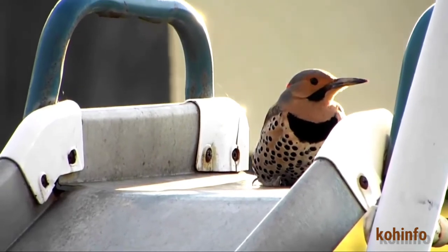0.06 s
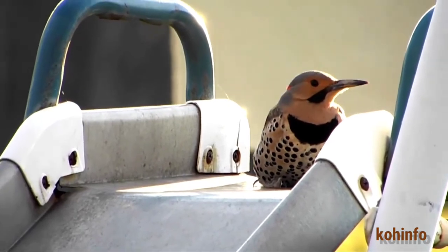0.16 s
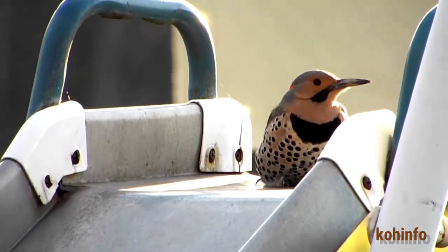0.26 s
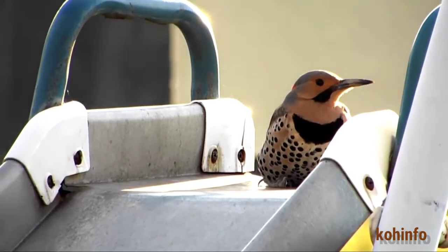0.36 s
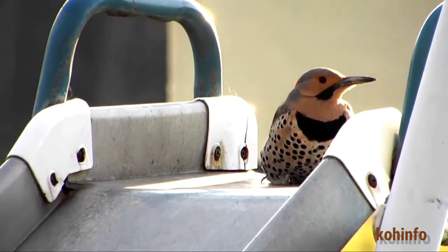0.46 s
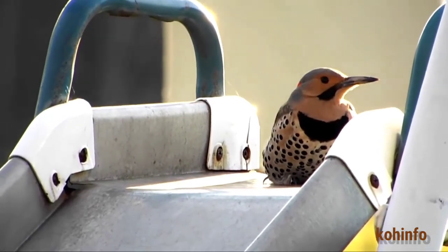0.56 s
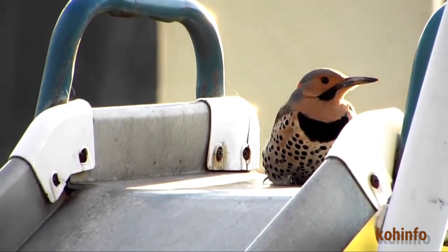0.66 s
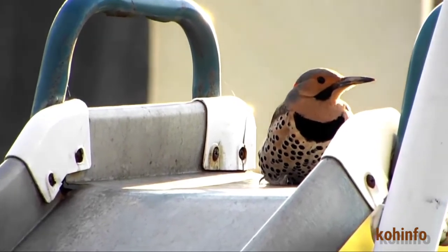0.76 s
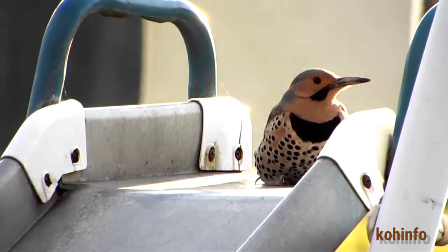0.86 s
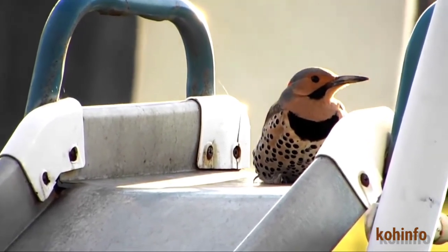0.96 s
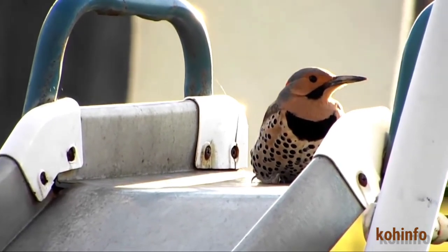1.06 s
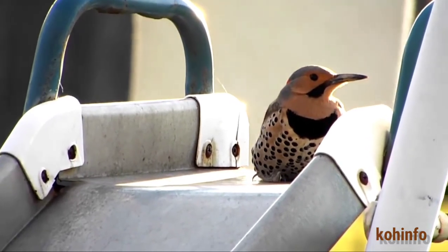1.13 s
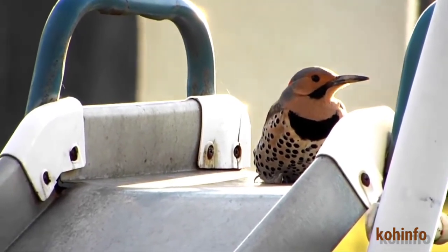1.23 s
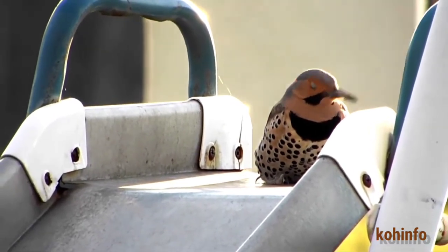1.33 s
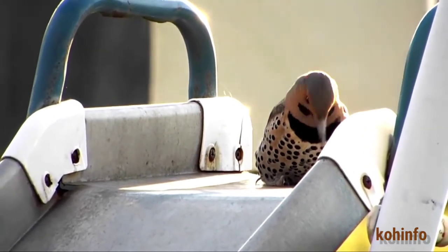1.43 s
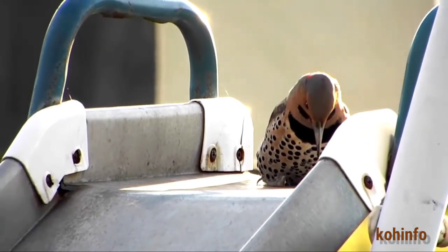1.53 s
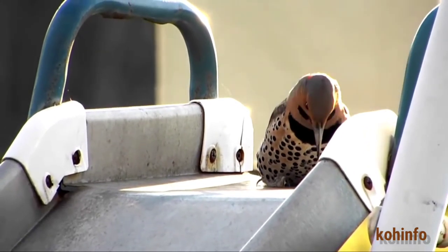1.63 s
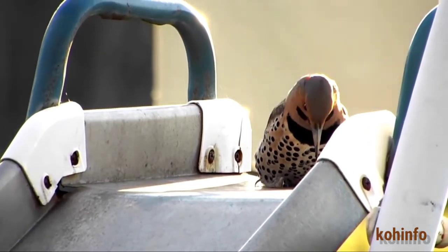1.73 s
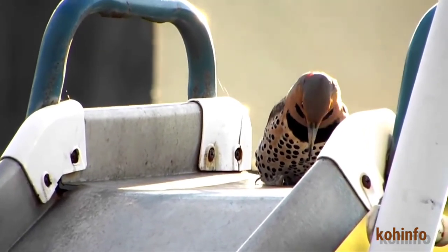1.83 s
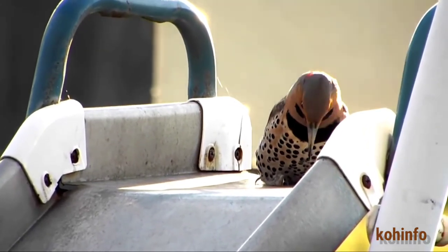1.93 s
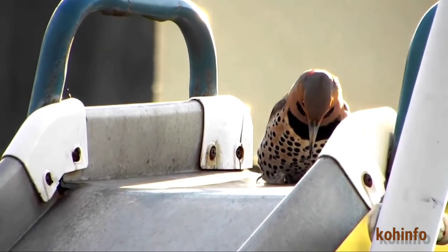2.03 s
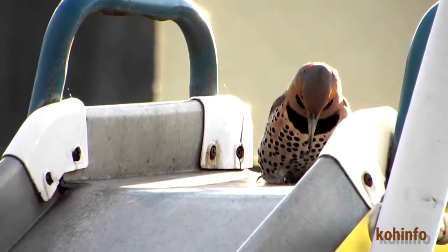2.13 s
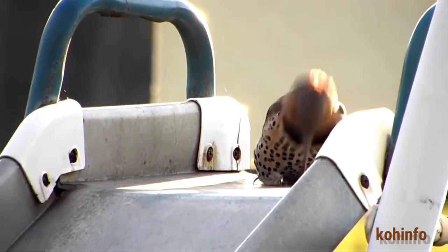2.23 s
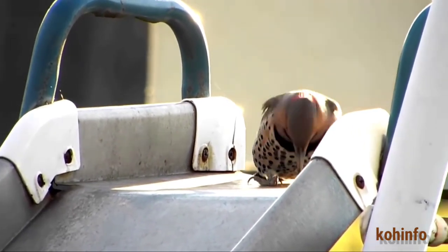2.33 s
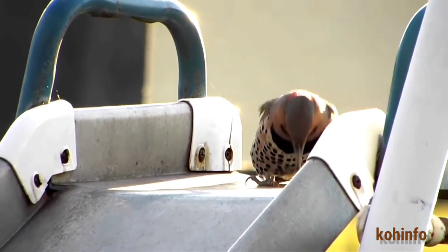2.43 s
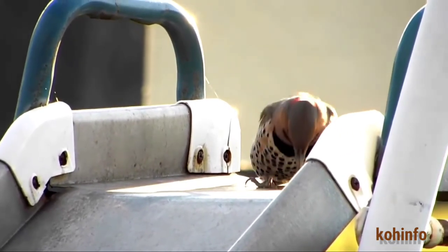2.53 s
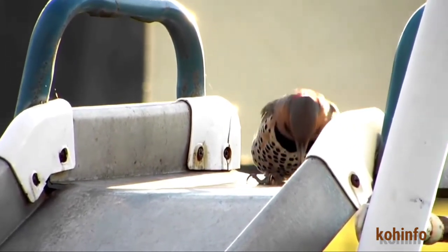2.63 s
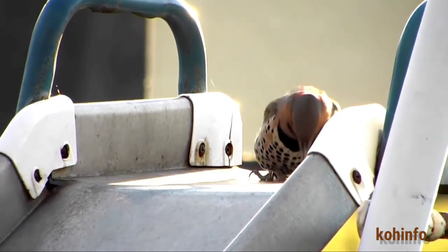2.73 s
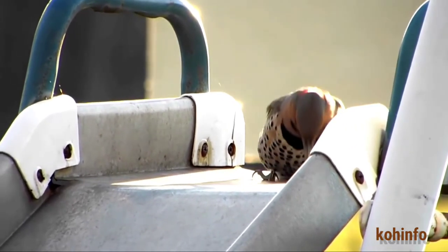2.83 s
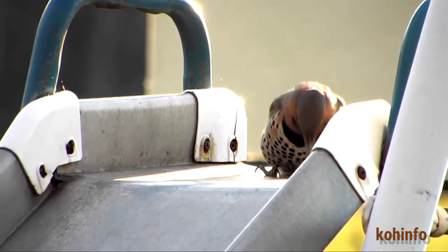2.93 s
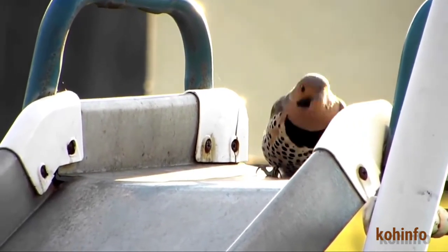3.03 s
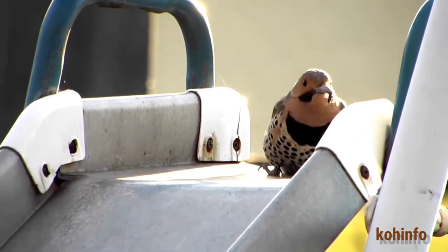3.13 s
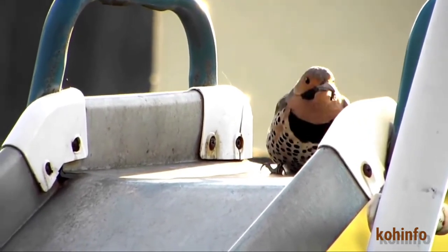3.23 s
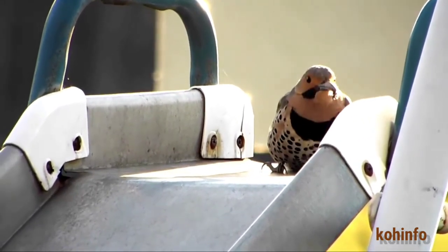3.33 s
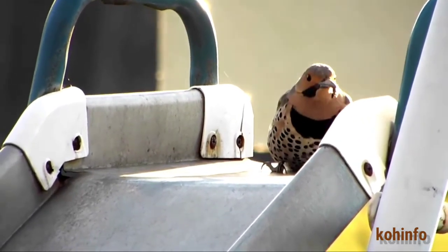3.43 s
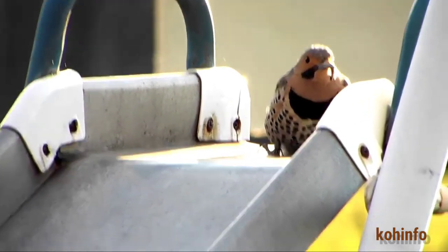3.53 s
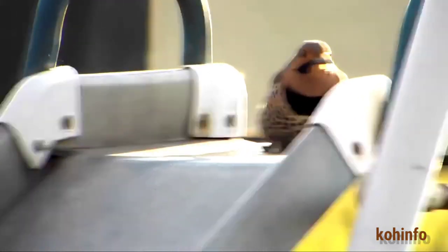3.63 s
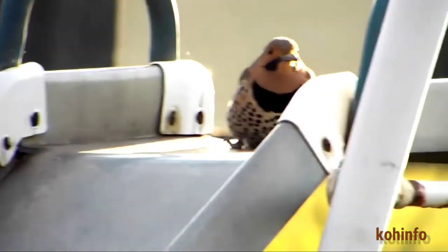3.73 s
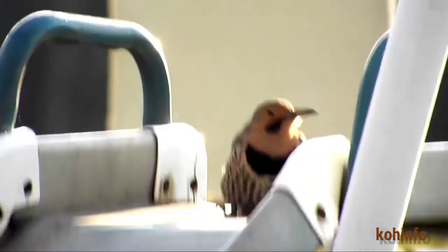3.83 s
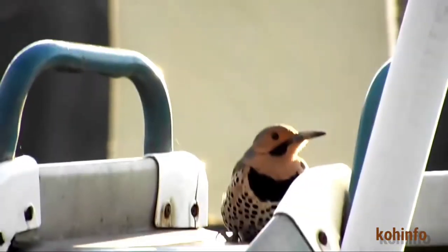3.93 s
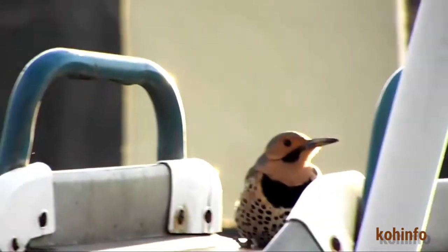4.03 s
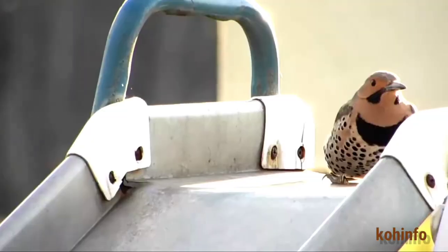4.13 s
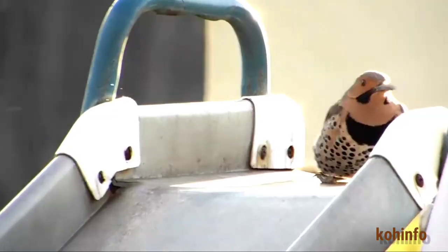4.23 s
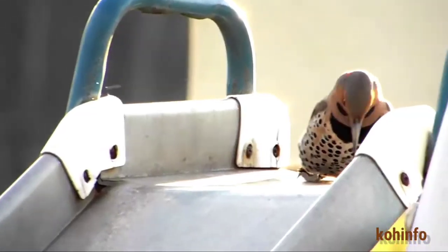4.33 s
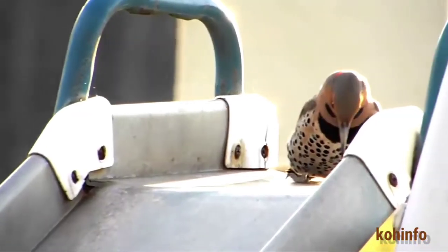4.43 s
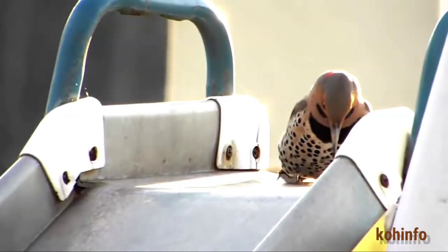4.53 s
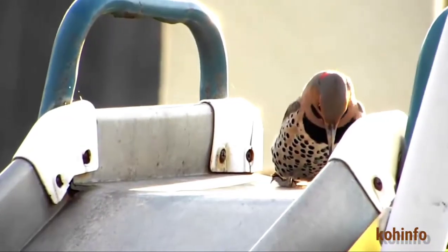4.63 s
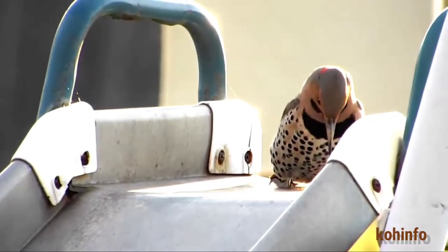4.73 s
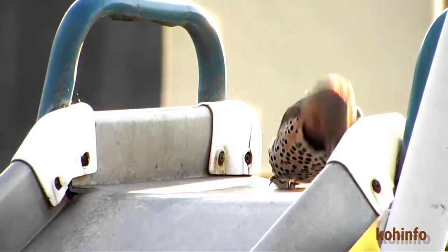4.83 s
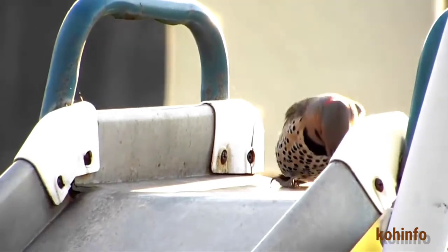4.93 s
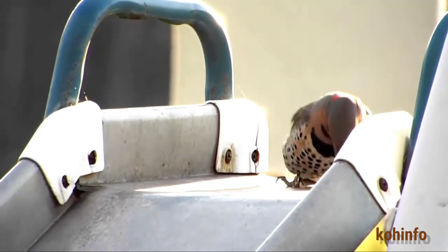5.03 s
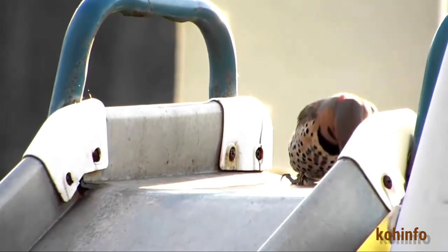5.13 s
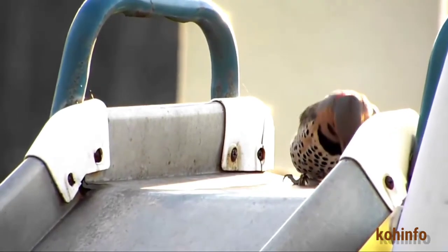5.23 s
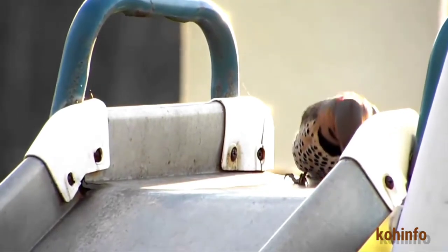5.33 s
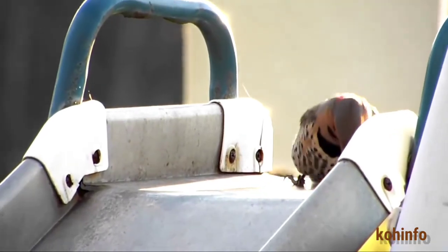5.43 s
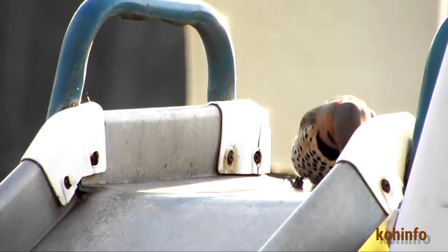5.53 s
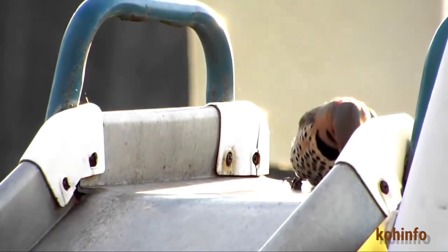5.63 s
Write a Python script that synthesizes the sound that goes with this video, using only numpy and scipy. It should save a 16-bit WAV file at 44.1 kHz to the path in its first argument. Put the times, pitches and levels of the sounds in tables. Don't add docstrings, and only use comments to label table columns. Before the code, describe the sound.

Outdoors, a distant bird trills quickly over murmuring traffic as a car draws away. Thin whistles and buzzes answer. Close by, a woodpecker drums a rapid, loud, clanging roll on hollow sheet metal, with wind thumping the microphone. Sharp claw snaps follow. The scene cuts to a quieter moment that fades in, birds continue, and a second metallic roll rings out.

```python
import sys
import numpy as np
from scipy import signal
from scipy.io import wavfile
from scipy.ndimage import uniform_filter1d

SR = 44100
rng = np.random.default_rng(int(sys.argv[2]) if len(sys.argv) > 2 else 0)


def ratio_of_db(decibels):
    return 10 ** (np.asarray(decibels, float) / 20)


def materialize(psi):
    bounded = np.clip(np.atleast_2d(psi).T, -1, 1)
    quanta = np.round(bounded * 32767).astype(np.int16)
    wavfile.write(sys.argv[1], SR, quanta)


N = 250033
CUT_S = 4.177


def evened(x):
    return x / np.sqrt(np.mean(x ** 2) + 1e-20)


def read(points, hz):
    f, value = np.transpose(points)
    return np.interp(np.log(hz + 1), np.log(f + 1), value)


def follow(curve):
    return np.interp(np.arange(N) / SR, *np.transpose(curve))


def add(mix, s, sound):
    part = mix[..., round(s * SR):][..., :sound.shape[-1]]
    part += sound[..., :part.shape[-1]]


def pan(db):
    return ratio_of_db(np.array([[db / 2], [-db / 2]]))


def noise(colour, size, same, patchy_db, length=N, t60=None):
    frames, hz = length * 4 // size + 5, np.fft.rfftfreq(size, 1 / SR)
    a, b, c, d, patches = rng.standard_normal((frames, len(hz), 5)).T
    patches = uniform_filter1d(patches, size // 64, 0)
    patches = evened(uniform_filter1d(patches, 8192 // size, 1))
    db = read(colour, hz)[:, None] + patchy_db * patches
    if t60:
        frame_s = np.arange(frames) * size / 4 / SR
        db = db - 60 * frame_s / read(t60, hz)[:, None]
    same = np.clip(read(same, hz), 0, 1)[:, None]
    left = a + 1j * b
    right = same * left + np.sqrt(1 - same ** 2) * (c + 1j * d)
    z = np.array([left, right]) * ratio_of_db(db)
    return evened(signal.istft(z, nperseg=size, noverlap=size * 3 // 4)[1][:, :length])


def tone(hz):
    return np.sin(2 * np.pi * np.cumsum(hz) / SR)


# mode_hz, level_db
FRAME_MODES = [
    [(344.5, -20.5), (748.3, -27), (893.6, -23), (1104, -18), (1297, -24), (1712, -29), (1809, -18),
     (1933, -37), (2369, -33), (2638, -29.5), (2972, -25), (3095, -37), (3246, -43), (3386, -29),
     (3709, -43), (3768, -46), (4091, -37), (4301, -48)],
    [(344.5, -22.5), (463.0, -40), (904.4, -21), (1093, -17), (1222, -51), (1297, -21.5), (1690, -44),
     (1803, -19), (1916, -28), (2035, -27), (2175, -45), (2466, -29.5), (3036, -27), (3779, -62),
     (3919, -59), (4113, -58), (4210, -59), (4382, -61)],
]
# mode_hz, t60_s
FRAME_DECAY = [(300, .36), (1000, .17), (2000, .28), (6000, .22)]
# band_hz, density_db (per Hz)
PANEL_COLOUR = [(240, -7), (400, 4), (653, -10.5), (874, 1), (973, -4), (1320, 6.5), (1590, -7), (1820, 5),
                (2190, -8), (5760, -7.5), (7710, -22), (12800, -22.5), (15600, -34)]
# band_hz, t60_s
PANEL_DECAY = [(300, .42), (1000, .4), (2000, .38), (6000, .45), (12000, .24)]


def drumming():
    out, t = np.zeros((2, N)), np.arange(SR // 3) / SR
    panels = dict(size=256, same=[(500, 1.0), (3000, 0.99), (7000, 0.82), (12000, 0.37)],
                  patchy_db=0.0, length=len(t), t60=PANEL_DECAY)
    usual = noise(PANEL_COLOUR, **panels)
    for s, db in blows():
        hz, mode_db = np.transpose(FRAME_MODES[int(s > CUT_S)])[:, :, None]
        spot_db = 2.2 * rng.standard_normal(hz.shape)
        turn = hz * s + np.clip(hz / 4000, .14, .3) * rng.standard_normal(hz.shape)
        decay_db = 60 * t / read(FRAME_DECAY, hz)
        modes = ratio_of_db(mode_db + spot_db - decay_db) * np.sin(2 * np.pi * (hz * t + turn))
        modes = modes * np.minimum(hz * t / 4, 1)
        clatter = .4 * usual + .9 * noise(PANEL_COLOUR, **panels)
        blow = ratio_of_db(8.0) * modes.sum(0) + ratio_of_db(-18.0) * clatter
        add(out, s, ratio_of_db(db) * blow * np.minimum(t / 0.0002, 1))
    return out


BEAT_S, UNEVEN_S = .04045, .0012
OPENING_DB, OPENING_S = 2, 0.038
SWAY_DB = 0.73
TIRE_DB, TIRE_S, TIRE_AT_S = -7.5, 0.058, 3.106
# first_blow_s, second_blow_s, blow_count, strength_db
DRUM_ROLLS = [
    (2.331, 2.379, 20, -8),
    (4.933, 4.974, 18, -8),
]


def blows():
    for first, second, count, db in DRUM_ROLLS:
        chance = rng.standard_normal((count, 2))
        later = second + BEAT_S * np.arange(count - 1) + UNEVEN_S * chance[1:, 0]
        s = np.r_[first, later]
        opening = OPENING_DB * np.exp(-((s - first) / OPENING_S) ** 2)
        tired = TIRE_DB * np.exp(-abs(s - TIRE_AT_S) / TIRE_S)
        yield from zip(s, db + opening + SWAY_DB * chance[:, 1] + tired)


# start_s, peak_db, ring_hz, high_ring_db, low_knock_db
CLAW_SNAPS = [
    (.924, -23, 4300, -20, -6),
    (2.244, -25, 5400, -20, -30),
    (3.6675, -11, 6400, -10, -25),
    (3.673, 3, 5670, -2, -22),
    (3.795, -25, 6500, -6, -25),
    (3.809, -2, 5630, -18, -11),
]


def snaps():
    out, t = np.zeros((2, N)), np.arange(1200) / SR
    crack_colour = [(700, -12), (2500, -2), (4500, 1), (9000, -6), (15500, -13)]
    for s, db, hz, high_db, knock_db in CLAW_SNAPS:
        crack = noise(crack_colour, size=256, same=[(1000, .3)], patchy_db=0, length=len(t))
        ring = np.sin(2 * np.pi * hz * t)
        ring = ring + 0.98 * np.sin(2 * np.pi * 1.11 * hz * t) + 0.26 * np.sin(2 * np.pi * .85 * hz * t)
        high = ratio_of_db(high_db) * np.sin(2 * np.pi * 7900 * t) * np.exp(-t / 0.0023)
        knock = np.sin(2 * np.pi * 900 * t) * np.exp(-t / 0.0048)
        bright = ring * np.exp(-t / .0028) + high + ratio_of_db(-6) * crack * np.exp(-t / .0025)
        add(out, s, ratio_of_db(db - 4) * pan(-4.5) * bright + ratio_of_db(db + knock_db) * knock)
    return out


def birds():
    far, near, thin, buzz = trill(), whistles(), seeps(), buzzes()
    direct = far * pan(.3) + near * pan(-2.0) + thin * pan(.3) + buzz * pan(-0.55)
    wet = far * ratio_of_db(.5) + near * ratio_of_db(-8) + thin * ratio_of_db(-7) + buzz * ratio_of_db(-6)
    return direct + garden(wet, far + ratio_of_db(-13) * buzz)


def trill():
    out, u = np.zeros(N), np.linspace(0, 1, 780)
    flick = tone(np.linspace(5200, 8200, 260)) * np.hanning(260)
    for s, db, hz, fall in chips():
        edges = np.minimum(u / 0.12, 1) * np.minimum((1 - u) / 0.096, 1)
        chip = tone(hz * (1.03 - fall * u ** 1.08)) * ratio_of_db(-12 * u) * edges
        add(out, s - .003, ratio_of_db(db - 7.0) * chip)
        add(out, s + 0.014, ratio_of_db(db - 21) * flick)
    return out


CHIP_START_S, CHIP_GAP_S, CHIPS = .3795, .05682, 27
CHIP_HZ, CHIP_HZ_PER_DB, CHIP_FALL, FALL_PER_DB = 5990, 12, .33, .006
# time_s, peak_db
TRILL_EFFORT = [(.38, -20.5), (.55, -17.5), (.72, -21.5), (.89, -14.5), (1.12, -15), (1.28, -9.5),
                (1.52, -12), (1.64, -13), (1.8, -12.5)]


def chips():
    chance = rng.standard_normal((CHIPS, 4))
    s = CHIP_START_S + CHIP_GAP_S * np.arange(CHIPS) + .0015 * chance[:, 0]
    db = np.interp(s, *np.transpose(TRILL_EFFORT)) + 1.6 * chance[:, 1]
    effort = db - db.max()
    hz = CHIP_HZ + CHIP_HZ_PER_DB * effort + 110 * chance[:, 2]
    return zip(s, db, hz, CHIP_FALL + FALL_PER_DB * effort + .04 * chance[:, 3])


# peak_s, rise_s, fall_s, pitch_hz, peak_db
HELD_WHISTLES = [(1.63, 0.0236, 0.083, 4016, -20), (1.918, .012, 0.039, 2780, -28.5),
                 (2.272, .022, 0.13, 6480, -24), (3.617, 0.036, 0.036, 5640, -26),
                 (3.805, 0.048, 0.0063, 5680, -26.5), (3.843, .01, .015, 5738, -38),
                 (3.942, 0.023, 0.015, 5660, -21.5), (4.112, 0.01, 0.048, 5780, -27),
                 (4.23, .06, 0.35, 4160, -42.5), (4.481, 0.019, 0.019, 2754, -21.5),
                 (5.462, 0.039, 0.014, 3880, -20)]
# start_s, length_s, first_hz, last_hz, peak_db
SLIDING_WHISTLES = [
    (1.455, 0.064, 7066, 6070, -19.5),
    (1.495, 0.043, 6290, 6185, -15),
    (1.655, .032, 3950, 3130, -26),
    (2.965, 0.039, 3700, 3840, -24),
    (2.992, .035, 3800, 3130, -23),
    (3.97, .02, 3600, 3230, -37),
]


def whistles():
    slides = slid(SLIDING_WHISTLES, rise=.35, hold=.3, start_db=-10, end_db=-9)
    return song(held(HELD_WHISTLES) + slides, flutter_db=2.2)


# peak_s, rise_s, fall_s, pitch_hz, peak_db
THIN_SEEPS = [
    (1.06, .015, 0.086, 7380, -42),
    (1.395, .01, 0.039, 7300, -40),
    (1.96, .01, 0.055, 7050, -38),
    (2.892, .012, 0.044, 7110, -35),
    (2.97, .03, .055, 7160, -37),
    (3.29, .03, 0.045, 7000, -33.5),
    (4.04, .04, .14, 6840, -46.5),
    (4.24, .04, 0.07, 6500, -41),
]


def seeps():
    return song(held(THIN_SEEPS), flutter_db=2.5)


# start_s, length_s, first_hz, last_hz, peak_db
HIGH_BUZZ = [
    (1.69, 0.176, 5330, 5220, -23),
    (3.375, 0.15, 4850, 4920, -39.5),
    (4.25, 0.131, 5400, 5240, -22),
]
# start_s, length_s, first_hz, last_hz, peak_db
LOW_BUZZ = [
    (1.95, 0.258, 3680, 3520, -26.5),
    (4.522, 0.15, 3595, 3410, -23),
]
# start_s, length_s, first_hz, last_hz, peak_db
ROUGH_CHIRRS = [
    (.915, 0.073, 4350, 4380, -37),
    (.915, 0.08, 4990, 4990, -38),
    (1.245, 0.12, 3750, 3780, -38.5),
    (1.26, 0.097, 5140, 4870, -33),
    (4.425, .035, 5400, 6900, -37.5),
    (5.365, 0.062, 4290, 4110, -23),
    (5.393, 0.034, 4120, 5410, -19.5),
    (5.458, 0.034, 2960, 3010, -21.5),
]


def buzzes():
    highs = slid(HIGH_BUZZ, rise=.15, hold=.5, start_db=-6, end_db=-14)
    lows = slid(LOW_BUZZ, rise=.15, hold=.5, start_db=-6, end_db=-14)
    chirrs = slid(ROUGH_CHIRRS, rise=.3, hold=.45, start_db=-7, end_db=-8)
    high = song(highs, throb_hz=51.5, dip=.09, flutter_db=1.8)
    low = song(lows, throb_hz=56.2, dip=.18, flutter_db=1.5)
    chirr = song(chirrs, throb_hz=140, dip=.16, flutter_db=2.2)
    return ratio_of_db(-3.0) * high + ratio_of_db(-6.0) * low + ratio_of_db(-3) * chirr


def held(rows):
    edge_db, sag = -14, .009
    return [[(s - rise, hz * (1 + sag), db + edge_db), (s, hz, db), (s + fall, hz * (1 - sag), db + edge_db)]
            for s, rise, fall, hz, db in rows]


def slid(rows, rise, hold, start_db, end_db):
    share = np.array([0, rise, min(rise + hold, .99), 1])
    edge_db = np.array([start_db, 0, 0, end_db])
    return [np.c_[s + length * share, first + (last - first) * share, db + edge_db]
            for s, length, first, last, db in rows]


def song(notes, throb_hz=0, dip=0, flutter_db=1.2):
    out = np.zeros(N)
    for rows in notes:
        s, hz, db = np.transpose(rows)
        t = np.arange(s[0], s[-1], 1 / SR)
        cycle = (t - s[0]) * throb_hz % 1
        grain = np.sin(np.pi * cycle) ** 4 * 2.34 if throb_hz else 1
        drift = uniform_filter1d(rng.standard_normal(len(t)), size=200)
        flutter = ratio_of_db(flutter_db * evened(uniform_filter1d(drift, size=200)))
        wobble = np.log(flutter) / np.log(ratio_of_db(flutter_db))
        pitch = np.interp(t, s, hz) * (1 + dip * (.5 - cycle) + .1 * dip * wobble)
        level = ratio_of_db(np.interp(t, s, db) + 5.0) * signal.windows.tukey(len(t), .2)
        add(out, s[0], tone(pitch) * level * grain * flutter)
    return out


# delay_s, level_db, left_right_db
WALL_ECHOES = [
    (.0055, -2, 6),
    (.011, -5, -5),
    (.017, -14, -12),
    (.024, -14, 12),
    (.033, -20, -12),
]
# band_hz, t60_s
GARDEN_DECAY = [(2500, 0.44), (5000, 0.53), (8000, 0.42)]


def garden(x, early):
    taps = np.zeros((2, SR // 2))
    at = np.arange(200, SR // 2 - 20, 20) + rng.integers(0, 20, (2, (SR // 2 - 201) // 20))
    np.put_along_axis(taps, at, rng.choice([-1., 1.], at.shape), 1)
    taps[1] = .4 * taps[0] + .92 * taps[1]
    hz, t, z = signal.stft(taps, SR, nperseg=256)
    tail = signal.istft(z * ratio_of_db(-60 * t / read(GARDEN_DECAY, hz)[:, None]), SR, nperseg=256)[1]
    tail = tail / np.linalg.norm(tail[0])
    before = np.arange(N) < CUT_S * SR
    out = np.zeros((2, N))
    for keep in (before, ~before):
        out += signal.fftconvolve([x * keep], tail, axes=1)[:, :N] * keep
    for delay, db, side_db in WALL_ECHOES:
        add(out, delay, ratio_of_db(db) * pan(side_db) * early)
    return out


# start_s, level_db, length_s, sign
AIR_PUSHES = [
    (2.426, -10, 0.02, 1),
    (2.484, -1.5, 0.0089, 1),
    (2.497, -12, 0.026, -1),
    (4.342, -9.5, 0.028, -1),
    (4.885, -11.5, 0.021, -1),
    (4.911, -12, 0.012, -1),
]


def thumps():
    out = np.zeros((2, N))
    for s, db, length, sign in AIR_PUSHES:
        u = np.linspace(-1, 2.5, round(length * SR * 1.75))
        lobe = (1 - 1.7 * u ** 2) * np.exp(-2.5 * u ** 2)
        add(out, s, np.sign(sign) * ratio_of_db(db) * lobe * pan(4.4))
    return out


# time_s, level_db
GUSTS = [(0.0, -30.5), (1.92, -35.5), (2.08, -31), (2.14, -37), (2.18, -26), (2.25, -47),
         (2.44, -16.5), (2.67, -33), (2.76, -27.5), (3.96, -34.5), (4.04, -26), (4.17, -22),
         (4.34, -25), (4.52, -29), (4.9, -25), (5.15, -32), (5.3, -25), (5.66, -32)]
# band_hz, density_db (per Hz)
GUST_COLOUR = [(7.1, -32), (12, 1), (38, 3.5), (55, -7.5), (75, -5), (130, -8.5), (170, -33.5), (290, -120)]


def wind():
    lumps = noise(GUST_COLOUR, size=2048, same=[(25, 0.062), (60, 0.61), (120, 0.77)], patchy_db=2.5)
    return ratio_of_db(follow(GUSTS) + 2.5) * lumps * pan(3.1)


# band_hz, left_right_likeness (0 to 1)
FIELD_LIKENESS = [(60, 0.45), (150, 1), (380, 0.68), (950, 1), (2380, 0.89), (5980, 0.58), (15000, 0.06)]
# band_hz, density_db (per Hz)
CAR_COLOUR = [(450, -26), (620, -2.5), (800, 5.5), (1100, 2), (1500, -6), (2200, -33)]


def passing():
    away = np.maximum(np.arange(N) / SR - 0.47, 0) / 0.17
    return ratio_of_db(-30.5) * np.exp(-away ** 2) * noise(CAR_COLOUR, size=1024, same=FIELD_LIKENESS, patchy_db=1.0)


# time_s, level_db
STREET_LEVEL = [(0, -3), (.9, 0), (1.3, -0.5), (1.8, -1.1), (2.3, -2.5), (3.2, 3.5), (3.6, -0.2),
                (4.17, 0.5)]
# band_hz, density_db (per Hz)
EARLY_TRAFFIC_COLOUR = [(220, -39), (380, -13.5), (439, -15.5), (587, -7), (850, -4), (959, -1.5),
                        (1020, -2), (1430, -0.5), (2600, -15), (3380, -15), (5720, -120)]
# band_hz, density_db (per Hz)
LATE_TRAFFIC_COLOUR = [(220, -45), (380, -4), (459, -7), (624, -7), (1180, -11), (1290, -8), (2500, -31),
                       (3250, -56), (5500, -120)]


def traffic():
    before = np.arange(N) < CUT_S * SR
    early = noise(EARLY_TRAFFIC_COLOUR, size=1024, same=FIELD_LIKENESS, patchy_db=1.73)
    late = noise(LATE_TRAFFIC_COLOUR, size=1024, same=FIELD_LIKENESS, patchy_db=1.73)
    return np.where(before, ratio_of_db(-27.5 + follow(STREET_LEVEL)) * early, ratio_of_db(-38) * late)


# band_hz, density_db (per Hz)
RUMBLE_COLOUR = [(65, 4), (110, -5), (210, 1.5), (265, -3), (301, -3.5), (450, -15), (580, -21),
                 (990, -120)]


def rumble():
    t = np.arange(N) / SR
    growing_db = -29 + 1.23 * t + 0.14 * follow(STREET_LEVEL)
    sinking_db = -34 - 5.0 * (t - CUT_S)
    deep = noise(RUMBLE_COLOUR, size=1024, same=[(120, 1.0), (300, 0.85)], patchy_db=0.3)
    return ratio_of_db(np.where(t < CUT_S, growing_db, sinking_db)) * deep


# time_s, level_db
BREEZE_LEVEL = [(0, -38), (.5, -38.5), (.95, -30), (1.15, -34), (1.4, -39), (1.7, -31), (2.08, -33),
                (2.3, -29), (3.25, -36.5), (3.6, -35), (4.0, -32.5), (4.16, -32.5), (4.35, -37),
                (4.55, -37.5), (4.9, -41.5), (5.67, -47)]
# band_hz, density_db (per Hz)
LEAF_COLOUR = [(900, -22), (1500, -6), (2200, -2), (3200, -1), (4200, -2.5), (5700, -2.5), (6900, -11),
               (9000, -24), (12000, -50)]


def leaves():
    return ratio_of_db(follow(BREEZE_LEVEL)) * noise(LEAF_COLOUR, size=512, same=FIELD_LIKENESS, patchy_db=3.0)


# band_hz, density_db (per Hz)
HISS_COLOUR = [(4120, -17), (7000, -6), (7290, -6.5), (9710, -6), (14900, -5), (15700, -17)]


def hiss():
    breeze = follow(BREEZE_LEVEL)
    level_db = -44.5 + 0.12 * (breeze - breeze.mean())
    return ratio_of_db(level_db) * noise(HISS_COLOUR, size=512, same=FIELD_LIKENESS, patchy_db=3.6)


def scene():
    near = drumming() + snaps() + birds() + thumps() + wind()
    return near + passing() + traffic() + rumble() + leaves() + hiss()


def top_cut(x):
    return signal.sosfilt(signal.butter(12, 15830, fs=SR, output="sos"), x)


def record(dry):
    since = np.arange(N) / SR - CUT_S
    fade_in = np.clip(abs(since / .2) ** 1.52, ratio_of_db(-30), 1)
    fade = np.where(since < 0, 1, fade_in)
    limited = np.clip(dry * uniform_filter1d(fade, size=200), -.95, .95)
    return top_cut(limited)


dry = scene()
out = record(dry)
materialize(out)
```